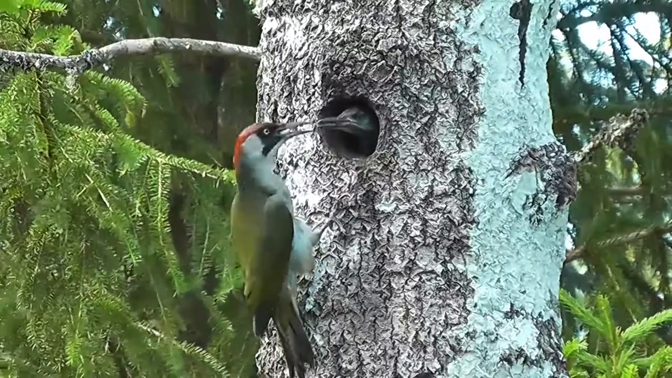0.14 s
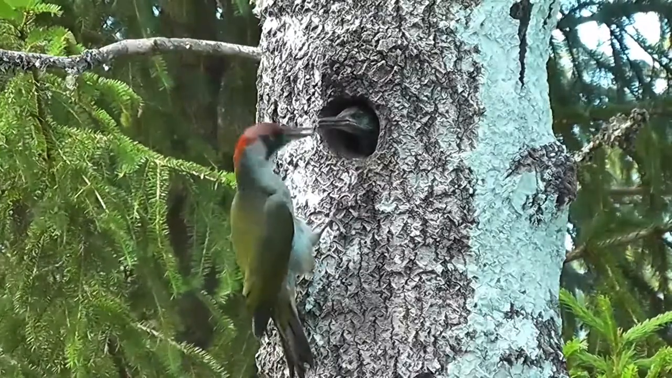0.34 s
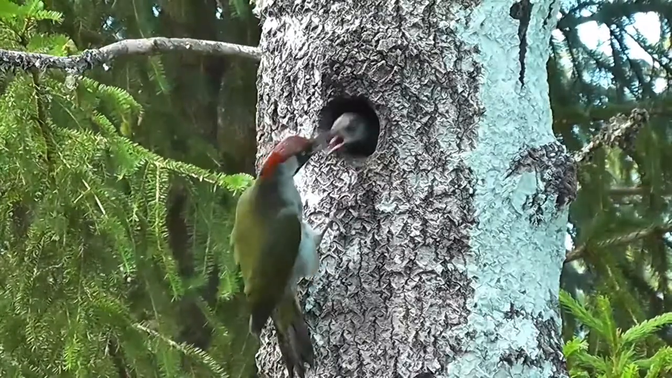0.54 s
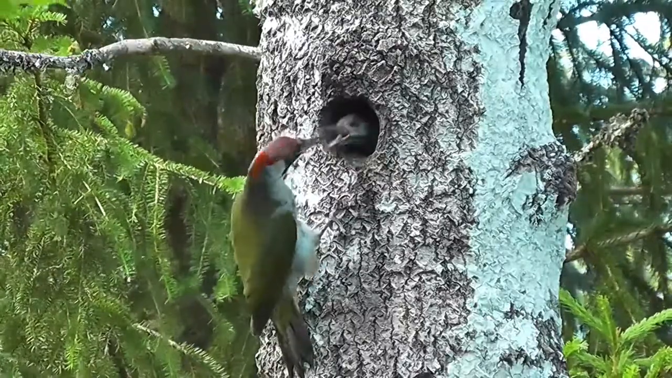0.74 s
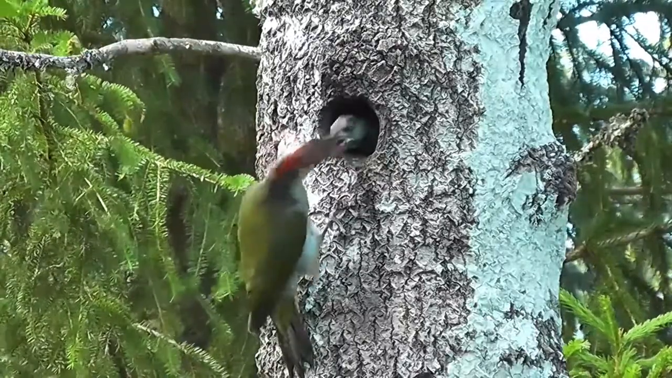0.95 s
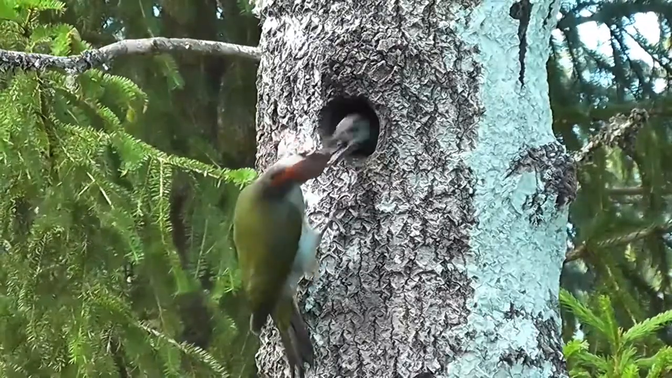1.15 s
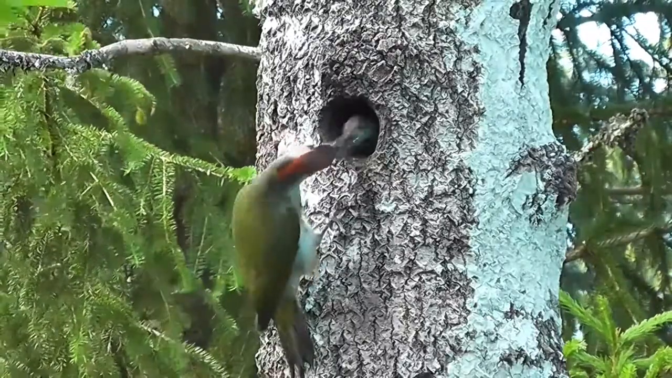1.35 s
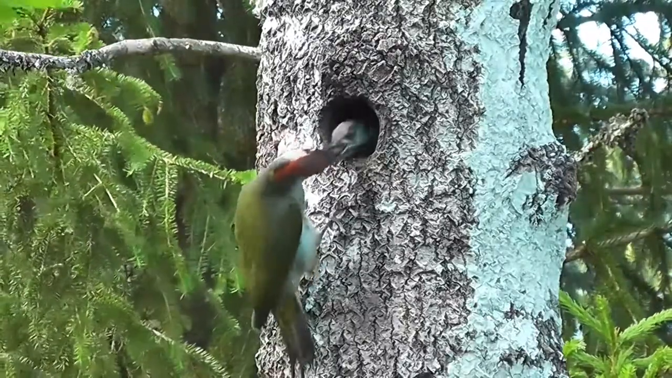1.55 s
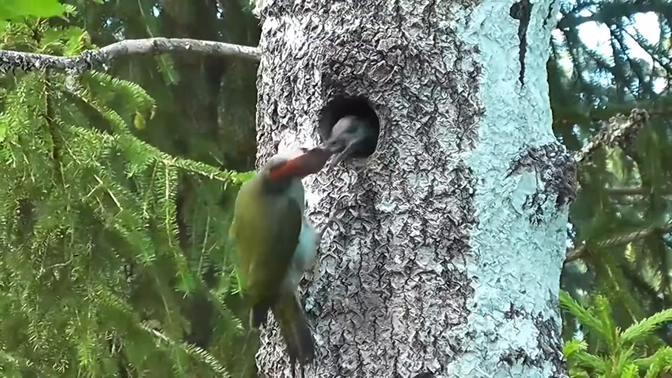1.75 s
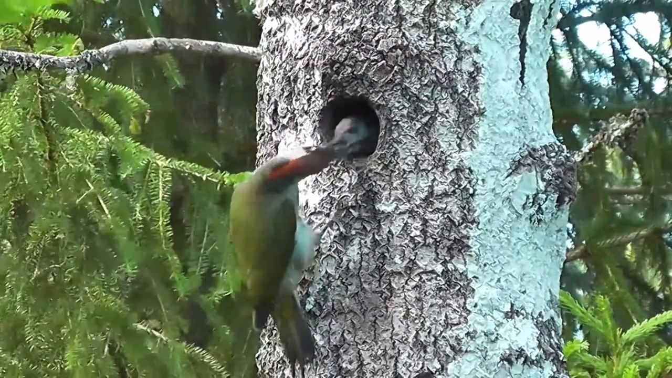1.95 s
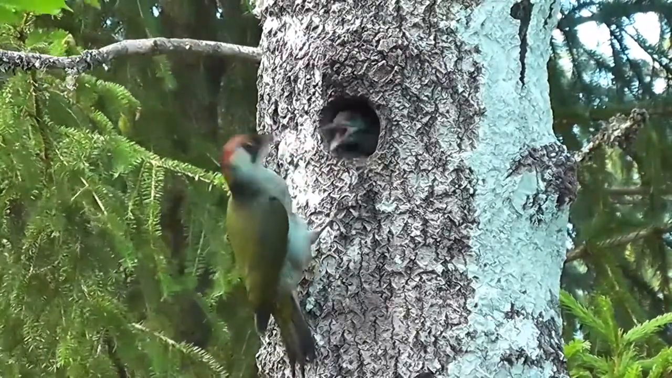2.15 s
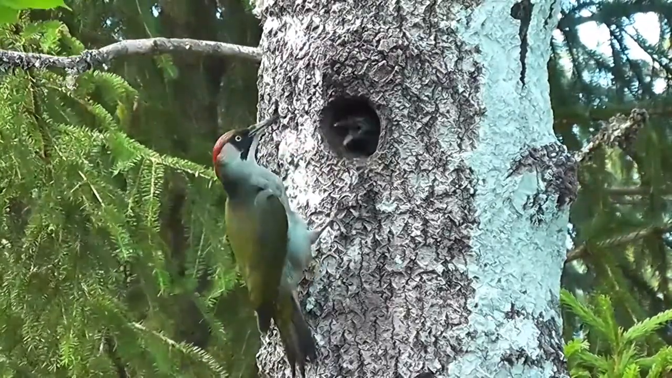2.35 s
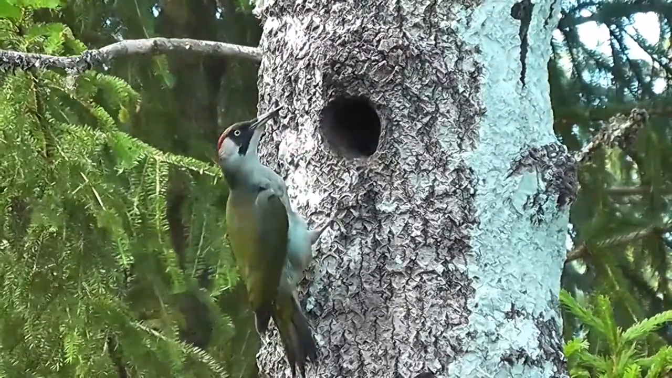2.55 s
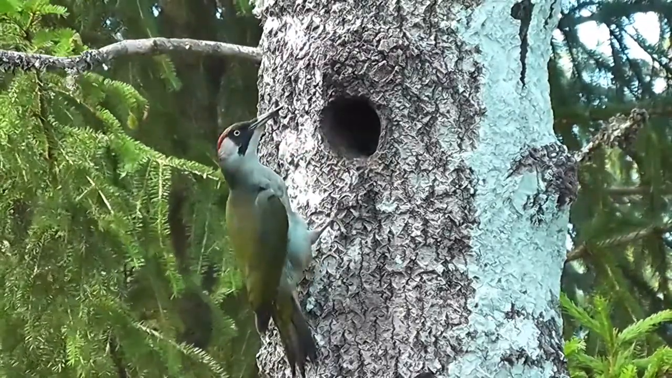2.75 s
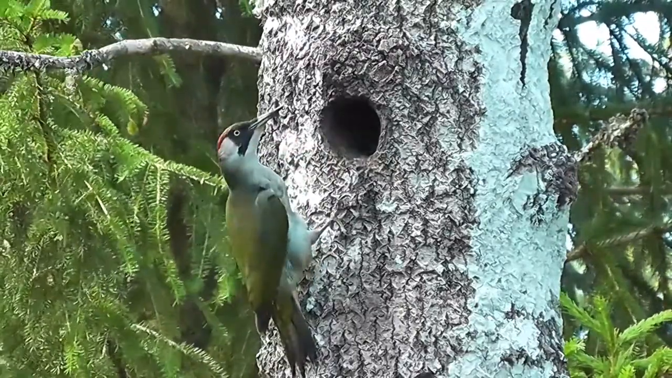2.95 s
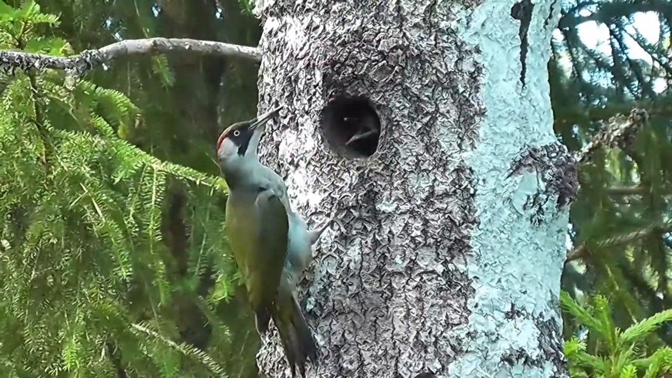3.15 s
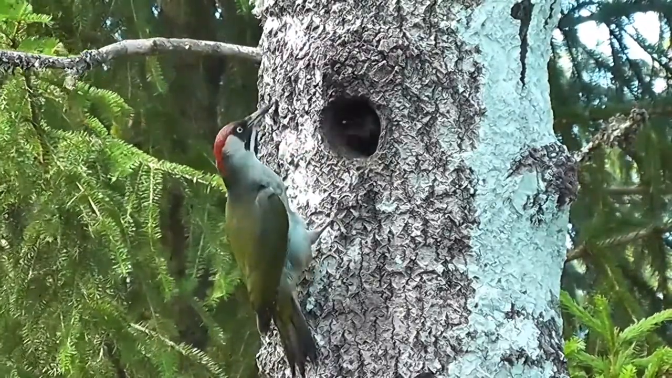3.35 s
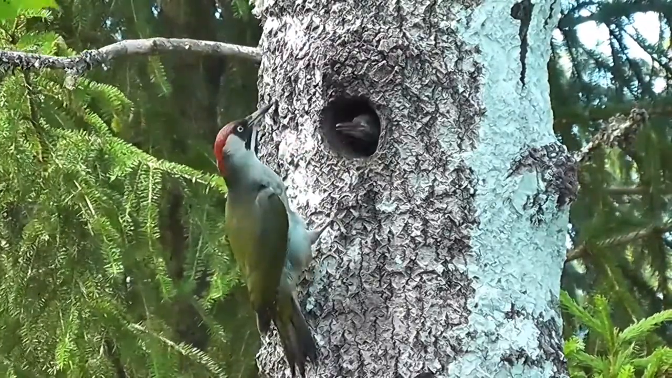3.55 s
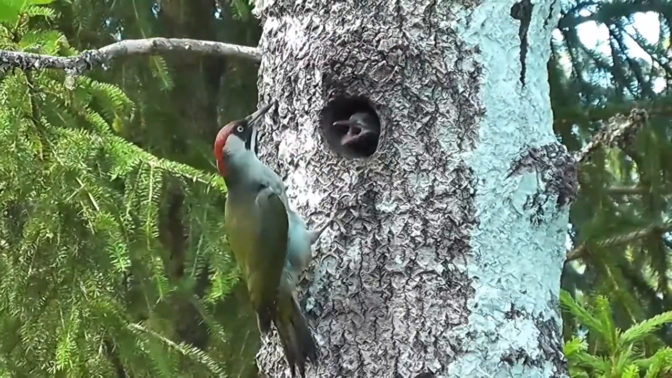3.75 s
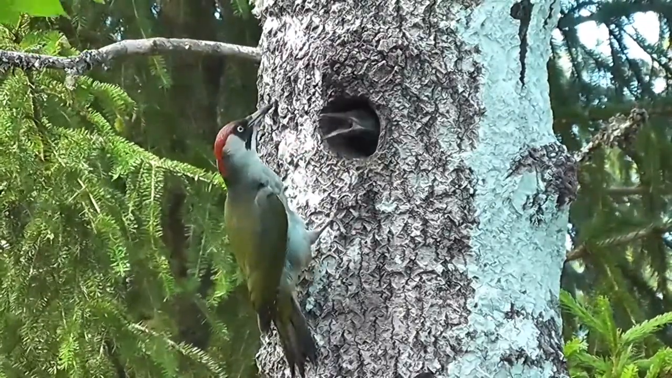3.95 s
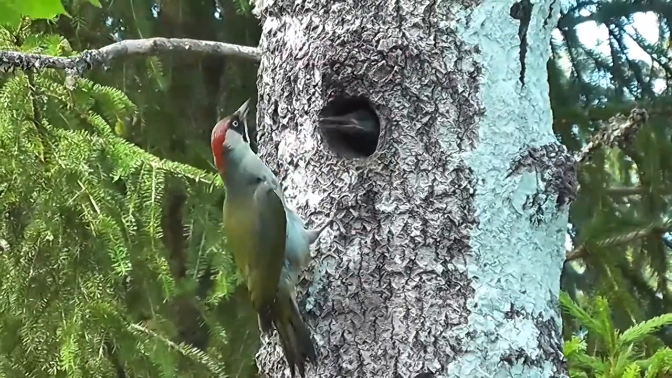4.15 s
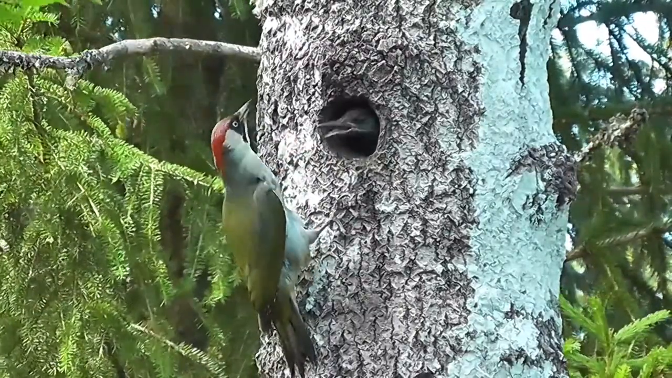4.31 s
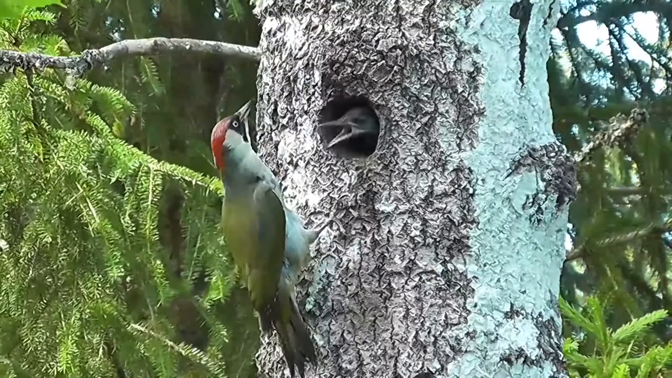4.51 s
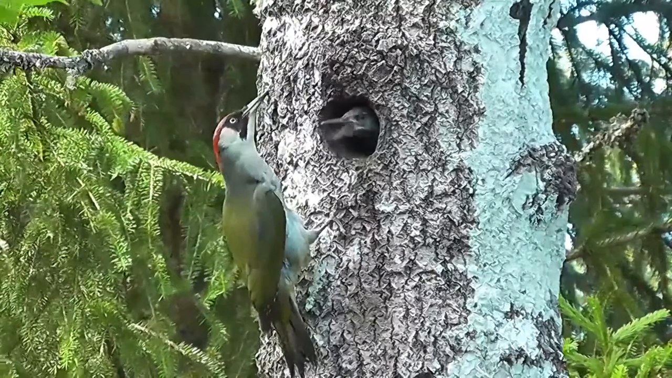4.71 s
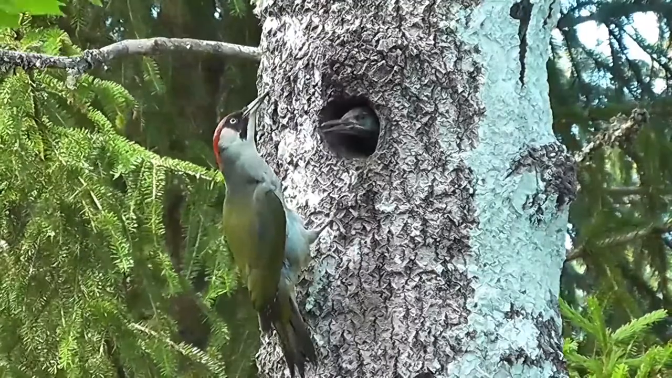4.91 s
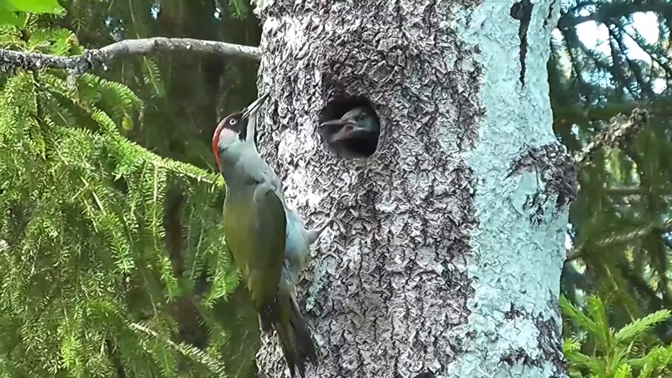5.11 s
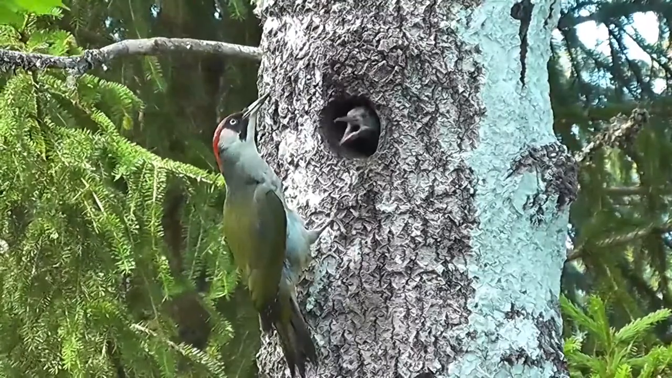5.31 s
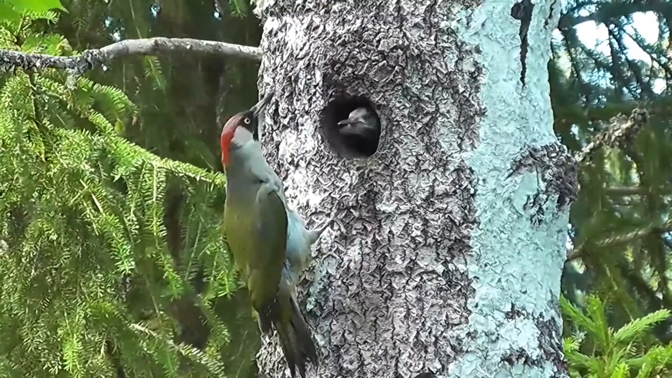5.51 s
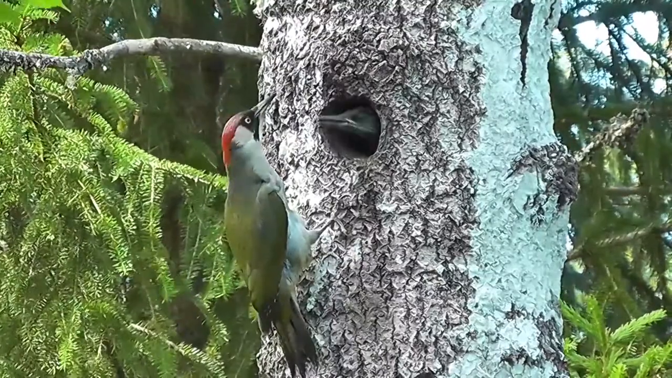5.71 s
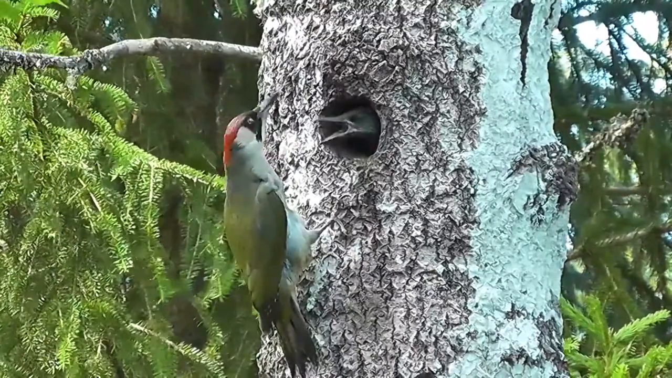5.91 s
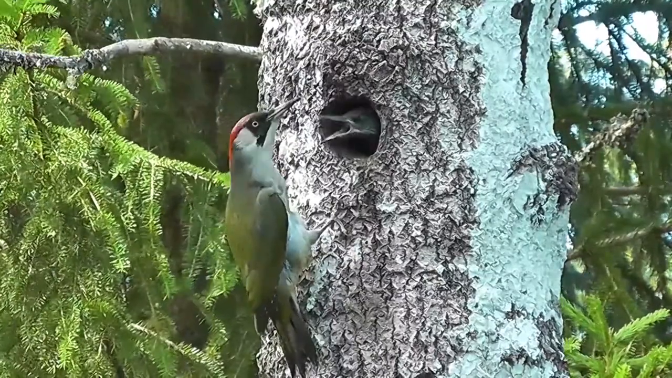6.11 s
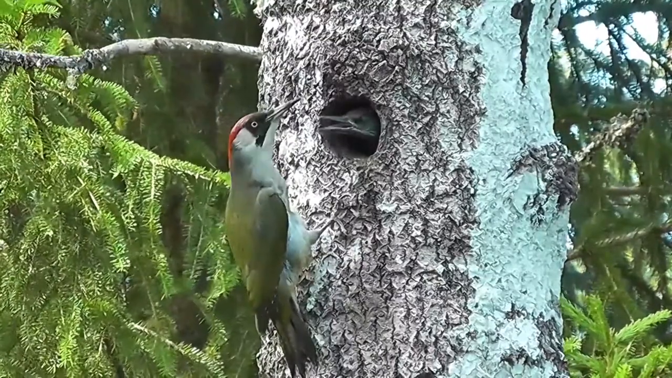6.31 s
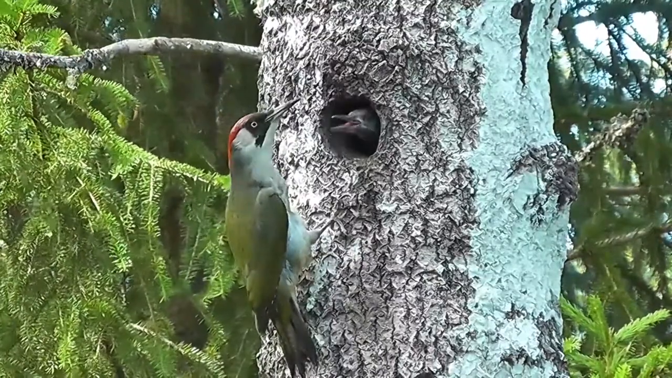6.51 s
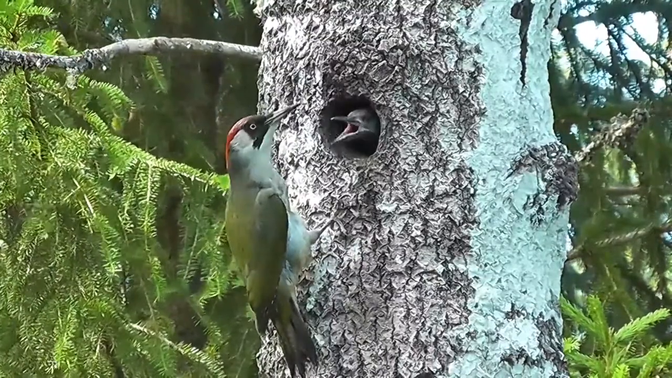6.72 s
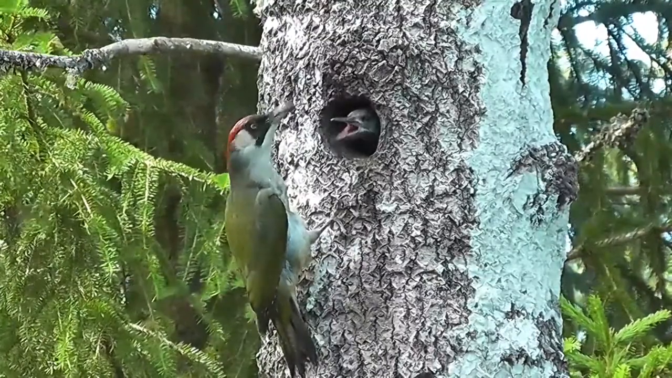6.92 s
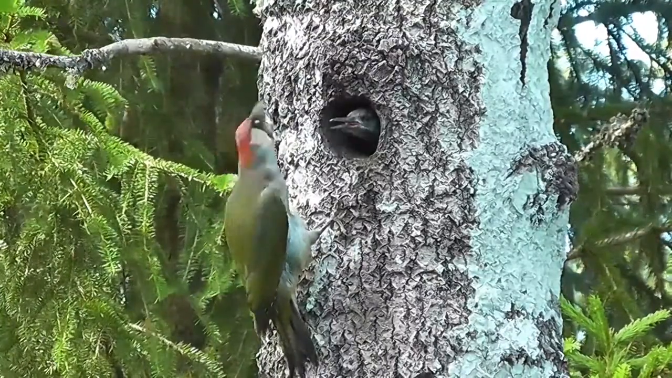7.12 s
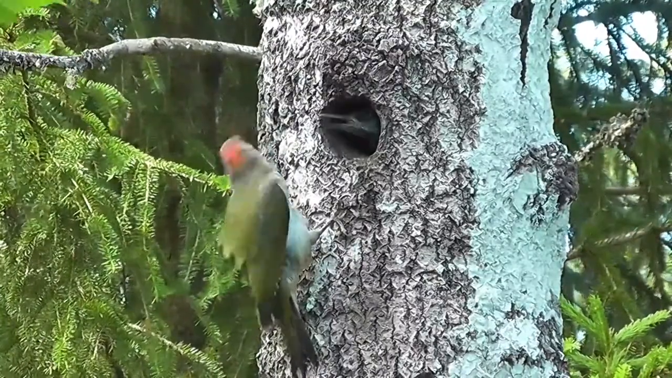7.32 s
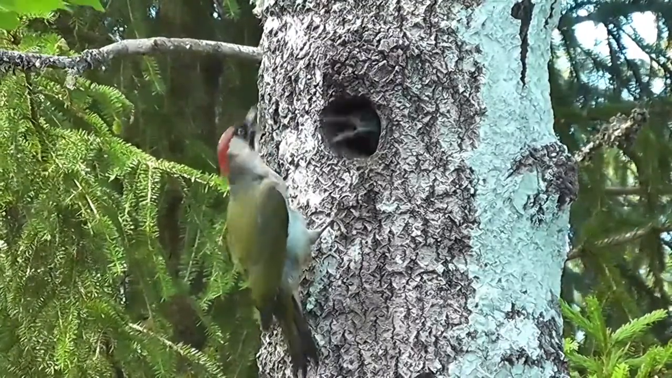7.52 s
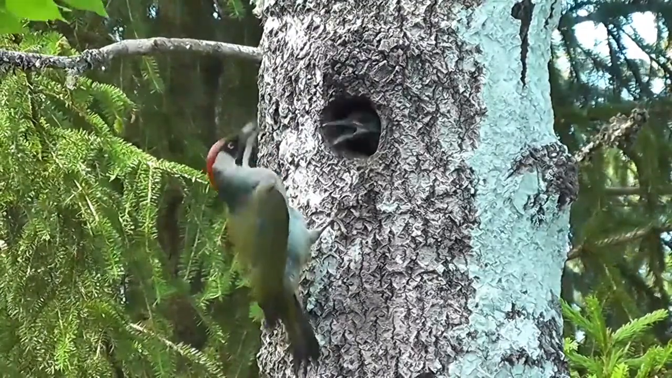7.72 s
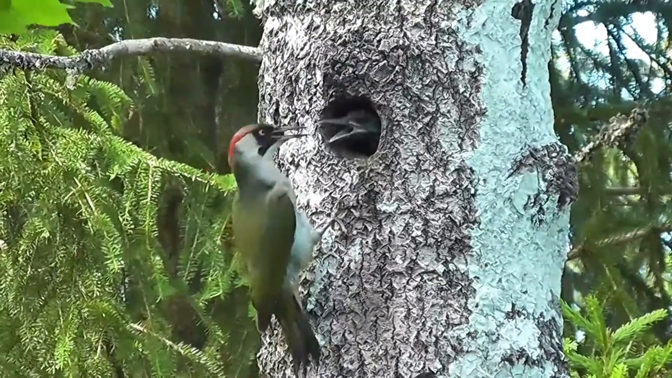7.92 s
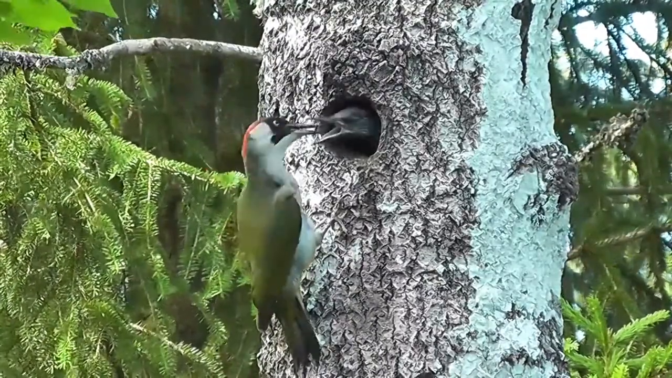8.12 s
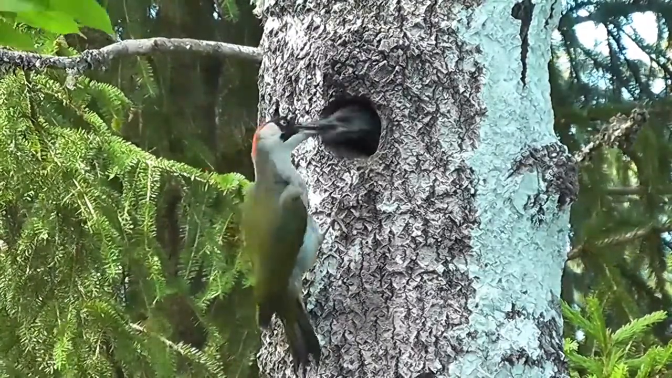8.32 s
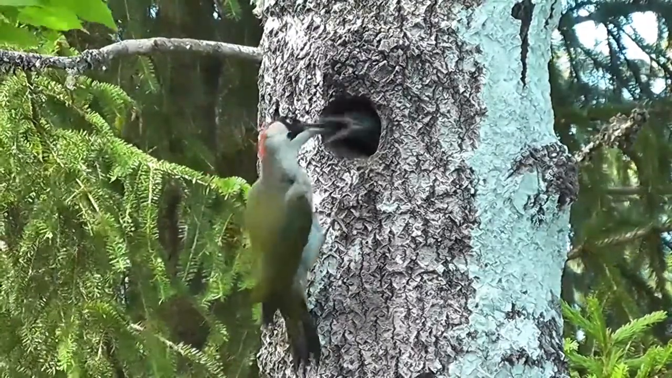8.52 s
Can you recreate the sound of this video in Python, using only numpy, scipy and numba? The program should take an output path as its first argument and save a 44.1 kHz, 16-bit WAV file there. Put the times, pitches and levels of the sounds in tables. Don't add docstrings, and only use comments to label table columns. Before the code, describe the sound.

A young woodpecker in a nest hole repeats harsh, scratchy notes, each a rasp snapping into a short falling yelp, three to four a second. A far songbird whistles thinly at first. The chick turns weak and peepy while fed, then begs loudly and steadily, ending a little rougher. Outdoor woodland, light echo from trees, soft hiss, low rumble and small wind puffs at the microphone.

```python
import sys
import numpy as np
from scipy import signal
from scipy.fft import rfft, irfft, next_fast_len
from scipy.io import wavfile
from scipy.ndimage import uniform_filter1d
from numba import njit

SR = 44100
rng = np.random.default_rng(int(sys.argv[2]) if len(sys.argv) > 2 else 0)


def attenuation_scalar(level_db):
    decades = np.asarray(level_db, float) / 20
    return 10 ** decades


def digitize_waveform(pressure):
    field = np.atleast_2d(pressure).T
    bounded = np.clip(field, -1, 1)
    quanta = np.round(bounded * 32767).astype(np.int16)
    wavfile.write(sys.argv[1], SR, quanta)


N = 381906


def level(x, db):
    return x * attenuation_scalar(db) / np.sqrt(np.mean(x ** 2))


def curve(times, values):
    return np.interp(np.arange(N) / SR, np.ravel(times), np.ravel(values))


def walk(rate):
    hold = int(SR / rate)
    steps = np.repeat(rng.standard_normal(N // hold + 1), hold)
    return 0.65 * uniform_filter1d(uniform_filter1d(steps, hold), hold)[:N]


@njit
def svf(x, hz, width):
    y, band, low = np.empty(len(x)), 0., 0.
    for i in range(len(x)):
        g, k = np.tan(np.pi * hz[i] / SR), width[i] / hz[i]
        v = (band + g * (x[i] - low)) / (1 + g * (g + k))
        band, low, y[i] = 2 * v - band, low + 2 * g * v, k * v
    return y


def steep(x, hz, width):
    hz, width = hz + np.zeros(N), 1.69 * width + np.zeros(N)
    return svf(svf(x, hz, width), hz, width)


def ring(x, modes):
    total = np.zeros(N)
    for k, (hz, width, db) in enumerate(modes):
        total = total + (-1) ** k * attenuation_scalar(db) * steep(x, hz, width)
    return level(total, 0)


def wood():
    # frequency in Hz, level in dB per Hz.
    spectrum = [(20, -17), (60, -4.5), (120, -5), (200, -3), (550, -4), (900, -9), (1400, -13.5),
                (2000, -18.5), (3000, -17), (6000, -16), (9000, -25.5), (15500, -41.5)]
    # frequency in Hz, likeness 0-1, left lead in rad, left minus right in dB.
    ports = [(40, .8, 2.5, -2.4), (130, .5, 2.3, -2), (300, .55, 1.7, -1.5), (700, .7, .8, 0),
             (1600, .72, 0, 0), (4000, .94, 0, 0), (9000, .99, 0, 0), (15000, .85, 0, 0)]
    log_hz = np.log(np.arange(1, N // 2 + 2) * SR / N)
    hz, like, lead, tilt_db = np.transpose(ports)
    like = np.interp(log_hz, np.log(hz), np.clip(like, 0, 1))
    lead = np.interp(log_hz, np.log(hz), lead)
    tilt_db = np.interp(log_hz, np.log(hz), tilt_db)
    colour_hz, colour_db = np.transpose(spectrum)
    colour = attenuation_scalar(np.interp(log_hz, np.log(colour_hz), colour_db))
    one, other = rfft(rng.standard_normal((2, N)) * attenuation_scalar(1.1 * walk(1.77)))
    hiss = level(irfft(colour * one, N), -52)
    hum = level(steep(rng.standard_normal(N), 61.9, 6), -59)
    left = rfft(hiss + hum)
    apart = np.sqrt(1 - like ** 2) * other * np.abs(left) / np.abs(other)
    right = like * np.exp(-1j * lead) * left + apart
    return irfft([left * attenuation_scalar(tilt_db / 2), right * attenuation_scalar(0.5 - tilt_db / 2)], N)


def wind():
    # centre in seconds, level in dB, pitch in Hz.
    gusts = [
        (2.15, -66, 86),
        (3.0, -42, 94.5),
        (3.681, -49, 75.6),
    ]
    t = np.arange(N) / SR
    puffs = np.zeros(N)
    for s, db, hz in gusts:
        puffs += attenuation_scalar(db) * np.exp(-((t - s) / 0.02) ** 2) * np.sin(2 * np.pi * hz * (t - s))
    return np.array([puffs, -puffs])


@njit
def trunks(x, lags, gain, damp):
    line, soft, out = np.zeros((8, 4096)), np.zeros(8), np.zeros((2, len(x)))
    for i in range(len(x)):
        total = 0.
        for k in range(8):
            soft[k] += (1 - damp) * (gain[k] * line[k, (i - lags[k]) & 4095] - soft[k])
            total += soft[k]
            out[k % 2, i] += soft[k]
        for k in range(8):
            line[k, i & 4095] = x[i] + soft[k] - total / 4
    return out


def trees(bird, far):
    trunk_t60_s, near_t60_s = 0.33, 0.2
    echo_db, near_db, wide = -22, -7.5, 0.16
    lags = rng.integers(300, 2400, 8)
    thrown = ring(bird, [(5000, 13500, -7.0), (1200, 2700, -9.5)]) * np.std(bird)
    long = trunks(thrown + 0.5 * far, lags, attenuation_scalar(-60 * lags / SR / trunk_t60_s), 0.063)
    wash = rng.standard_normal((2, 8000)) * attenuation_scalar(-60 * np.arange(8000) / SR / near_t60_s)
    wash *= attenuation_scalar(near_db - echo_db) / np.sqrt(np.sum(wash ** 2))
    one, other = long + signal.fftconvolve([thrown + 2.8 * far], wash, axes=1)[:, :N]
    side = wide * (one - other)
    return attenuation_scalar(echo_db) * np.array([one + other + side, one + other - side])


def arch(start, crest, hz, db):
    end = crest + 0.062
    s = np.arange(start, end, 0.005)
    climb = (np.maximum(crest - s, 0) / 0.33) ** 1.9
    drop = (np.maximum(s - crest, 0) / 0.14) ** 2.8
    swell_db = np.interp(s, [start, start + 0.035, crest, end], [-11, 0, 0, -3])
    return list(zip(s, hz * (1 - climb - drop), db + swell_db))


def songbird():
    # time in seconds, pitch in Hz, level in dB.
    opening = [
        (0.2, 7600, -58),
        (0.21, 7750, -51),
        (0.235, 7840, -51),
        (0.28, 8700, -47.5),
        (0.3, 8380, -50),
        (0.335, 8450, -50),
    ]
    # start in seconds, crest in seconds, crest pitch in Hz, level in dB.
    arches = [
        (.513, .622, 8200, -48),
        (.89, .995, 8150, -51),
        (1.305, 1.447, 8250, -49),
        (1.75, 1.855, 7950, -56.5),
    ]
    # time in seconds, pitch in Hz, level in dB.
    slurs = [
        [(5.365, 2336, -64), (5.39, 2494, -72), (5.405, 3080, -68)],
        [(6.175, 2365, -67), (6.2, 2400, -60), (6.225, 2950, -56)],
    ]
    calls = [opening] + [arch(*whistle) for whistle in arches] + [list(slur) for slur in slurs]
    s, hz, db = np.transpose(sorted(sum(calls, [])))
    sounding = np.zeros(N)
    for call in calls:
        first, last = call[0][0], call[-1][0]
        sounding += curve([first - 0.004, first, last, last + 0.002], [0, 1, 1, 0])
    pitch = uniform_filter1d(curve(s, hz), size=600) * (1 + 0.0034 * walk(150))
    loudness = attenuation_scalar(curve(s, db) + 2.5 * walk(140))
    return np.sqrt(2) * sounding * loudness * np.sin(2 * np.pi * np.cumsum(pitch) / SR)


def wheeze():
    # time in seconds, pitch of the absent fundamental in Hz, level in dB.
    breath = [
        (3.69, 340.7, -78),
        (3.704, 347, -60),
        (3.72, 378, -62),
        (3.76, 383, -59),
        (3.775, 362, -46),
    ]
    s, hz, db = np.transpose(breath)
    turn = 2 * np.pi * np.cumsum(curve(s, hz)) / SR
    inside = curve(s[[0, -1]], [1, -1]) ** 2 < 1
    return attenuation_scalar(curve(s, db)) * inside * (np.sin(3 * turn) + np.sin(4 * turn) + 0.98 * np.sin(5 * turn))


@njit
def snap(hz, jitter, scatter, chance):
    pulses, phase, p, k = np.zeros(len(hz) + 16), np.empty(len(hz)), 0., 0
    for i in range(len(hz)):
        step = hz[i] * np.exp(jitter[i] * chance[k, 0]) / SR
        p += step
        if p >= 1:
            p, k = p - 1, k + 1
            for j in range(16):
                d = j - 8 + p / step
                size = np.exp(scatter[i] * chance[k, 1])
                pulses[i + j] += size * np.sinc(.8 * d) * (1 + np.cos(np.pi * d / 9))
        phase[i] = p
    return pulses[8:-8], phase


def syrinx(pitch, rough):
    clicks, phase = snap(pitch, 0.15 * rough ** 2, 0.3 * rough, rng.standard_normal((N // 20, 2)))
    air = level(np.exp(-phase / 0.5) * rng.standard_normal(N), 0)
    clicks = level(clicks, 0)
    source = clicks + 2.08 * rough ** 1.13 * air
    beat = clicks + 2.04 * rough * air
    return source, beat


def tract(source, beat, start, lock, top, end, jump, pitch, locked):
    # time in seconds, beak open 0-1, neck drawn in 0-1, facing the microphone 0-1,
    # windpipe open 0-1.
    posture = [(0.041, 0.96, 0.86, 1, 0.67), (.62, 0.87, 0.71, 0.63, 0.52), (.89, 0.97, 0.7, 0.72, 0.56),
               (1.3, .65, 0.97, 0.42, 0.71), (2.6, 0.27, 0.93, .4, 0.74), (2.75, 0.76, -.1, .42, 0.51),
               (3.27, 0.68, 0.48, 0.66, 0.45), (3.65, 0.97, .75, 0.89, 0.48), (4.06, 0.54, 0.44, 0.43, .33),
               (4.75, 0.97, 0.56, 0.45, 0.51), (5.68, 0.7, 0.49, 0.37, 0.06), (5.96, 0.48, .42, 0.31, 0.24),
               (6.23, 0.69, 0.55, 0.59, 0.47), (6.5, 0.85, .45, 0.41, 0.4), (7.06, 0.83, 0.54, .42, 0.39),
               (7.31, 0.43, 0.15, 0.46, 0.31), (8.1, 0.58, 0.18, 0.53, 0.39), (8.63, 0.29, 0.48, 0, 0.37)]
    # centre in Hz, width in Hz, level in dB.
    throat = [(3700, 400, 0)]
    windpipe = [(1089, 340, -5), (3070, 1900, -4)]
    gape = [(5785, 206, -4.5), (6285, 540, 0), (7994, 1100, -7)]
    breath_hiss = [(9220, 2120, 16.5), (12660, 4200, -1)]
    broad_band = [(6900, 1200, 0)]
    s, *controls = np.transpose(posture)
    beak, neck, facing, pipe = (np.interp(start, s, c) for c in controls)
    held = np.c_[start - 0.05, np.r_[start[1:] - 0.06, N / SR]]

    def pose(base, change, v):
        return curve(held, base + change * np.c_[v, v])

    gape_db, hiss_db = pose(-24, 28, beak), pose(-12.5, 14, facing)
    pipe_db = pose(-12, 18.5, pipe) + locked * pose(7.5, -0.88, jump)
    chest_db = pose(-30.5, 27.5, neck) + locked * pose(2, -0.25, jump)
    chest_hz = 850 + 0.12 * (pitch - 850)
    linger_db = curve(np.c_[lock - 0.02, lock, top, end, end + 0.03], np.tile([0, 3, 0, 7, 0], len(top)))
    pipe_hz = np.c_[1110 + 694 * beak, np.full((len(top), 2), 1880)]
    pipe_hz = curve(np.c_[start, top, end], pipe_hz)
    throat_hz = 3760 + 1367 * beak
    rest_hz = 4620 + 0.18 * (throat_hz - 4620)
    throat_hz = curve(np.c_[start, top, end], np.c_[rest_hz, throat_hz, throat_hz]) * (1 + 0.03 * walk(25))
    voice = ring(source, [(throat_hz, pose(396, 550, beak), 0)])
    voice -= attenuation_scalar(pose(-3, 12, facing) - 7.0) * ring(source, throat)
    voice += attenuation_scalar(chest_db + linger_db) * ring(beat, [(chest_hz, 190, 0)])
    voice += attenuation_scalar(pipe_db) * ring(beat, [windpipe[0], (pipe_hz, 480, 0), windpipe[1]])
    voice -= attenuation_scalar(gape_db - 0.96 * locked + 4 * walk(30)) * ring(source, gape)
    voice -= attenuation_scalar(hiss_db - 3.9 * locked + 2.5 * walk(33)) * ring(source, breath_hiss)
    voice += attenuation_scalar(-22 + (gape_db + hiss_db) / 2) * ring(source, broad_band)
    return voice


def chick():
    # start in seconds, top of the yelp in seconds, rasp level in dB, yelp level in dB, pitch in Hz.
    hungry = [
        (0.037, 0.136, -44.5, -32, 843.3),
        (0.322, 0.409, -44, -32, 809),
        (.624, 0.732, -44, -40.5, 853.5),
        (0.89, 1.008, -41, -35, 846),
    ]
    fed = [
        (1.164, 1.189, -59.5, -50, 896),
        (1.305, 1.321, -59, -54.5, 1050),
        (1.524, 1.576, -54.5, -46, 892),
        (1.782, 1.83, -57, -51, 781),
        (2.027, 2.043, -58, -54, 950),
        (2.287, 2.347, -60, -51, 843),
        (2.482, 2.536, -54, -41.5, 887),
        (2.595, 2.61, -58, -53, 863),
    ]
    begging = [(2.746, 2.831, -47, -40, 844), (3.01, 3.085, -41, -29.5, 868),
               (3.267, 3.349, -38.5, -24, 976), (3.518, 3.612, -38.5, -28, 930.4),
               (3.788, 3.884, -37, -25, 965), (4.057, 4.143, -36, -22.5, 916.3),
               (4.324, 4.408, -38, -22, 912), (4.593, 4.681, -39.5, -21, 854),
               (4.863, 4.953, -37.5, -24, 884), (5.159, 5.23, -41, -23, 829), (5.43, 5.51, -36.5, -24, 797),
               (5.678, 5.782, -34, -21.5, 810), (5.96, 6.055, -35, -20.5, 864),
               (6.23, 6.327, -39.5, -22.5, 897.6), (6.504, 6.592, -38.5, -24.5, 850.5),
               (6.797, 6.881, -43, -24, 810), (7.061, 7.149, -41, -27, 914),
               (7.31, 7.426, -38.5, -33.5, 899.5), (7.595, 7.689, -39, -33, 933.6),
               (7.85, 7.955, -37.5, -26.5, 973), (8.098, 8.222, -39, -33, 971),
               (8.363, 8.461, -39.5, -39.5, 955), (8.628, 8.648, -45, -33, 902)]
    start, top, early_db, top_db, hz = np.transpose(hungry + fed + begging)
    jump = top_db - early_db
    late_db = early_db + 0.15 * jump
    yelp_rough = np.clip(0.75 - 0.033 * jump + 0.015 * np.maximum(-40 - top_db, 0), 0.27, 1)
    rise = np.clip(0.011 + 0.52 * (0.094 - top + start), 0.011, 0.016)
    fall_s, clear_s = 0.017, 0.021
    lock = np.maximum(top - 0.015, start + 0.016)
    top = np.maximum(top, lock + 0.002)
    end = top + 0.019

    times = np.c_[start - 2.2 * rise, start - rise, start, start + 0.014, lock, top, top + 0.01, end, end + 0.016]
    rasp_db = np.c_[early_db - 34, early_db - 19, early_db - 5, early_db, late_db]
    yelp_db = np.c_[top_db, top_db - 4, top_db - 10, top_db - 36]
    db = curve(times, np.c_[rasp_db, yelp_db])

    times = np.c_[start, lock, top + 0.004, top + fall_s, top + 2 * fall_s]
    fallen_hz = 0.85 * hz
    pitch = curve(times, np.c_[hz, 1.06 * hz, hz, fallen_hz, 0.85 * fallen_hz])

    times = np.c_[lock, lock + 0.005, top + clear_s, top + 2 * clear_s]
    locked = curve(times, np.tile([0, 0.95, 0.99, 0.25], len(top)))
    times = np.c_[start - 0.06, start - 0.05, end, end + 0.02]
    locked *= curve(times, np.tile([0, 0, 1, 1], len(top))) > 0.3
    rasp_rough = 0.8
    rough = np.clip(rasp_rough + locked * (curve(top, yelp_rough) - rasp_rough), 0, 1)

    source, beat = syrinx(pitch, rough)
    voice = tract(source, beat, start, lock, top, end, jump, pitch, locked)
    return attenuation_scalar(db + 1.3 * walk(60)) * voice * attenuation_scalar(0.5)


def scene():
    bird, far = chick() + wheeze(), songbird()
    lean = 0.45 * steep(bird, 950, 400) + 0.29 * steep(bird, 2500, 610) + 0.32 * steep(bird, 14100, 6300)
    lean = np.roll(lean, 11)
    return wood() + wind() + trees(bird, far) + far + bird + np.array([lean, -lean])


def low_pass(x):
    return signal.sosfilt(signal.butter(12, 15740, fs=SR, output="sos"), x)


def record(dry):
    # frequency in Hz, gain in dB.
    housing = [(2200, 0), (2800, -2), (3150, -4), (3400, 0)]
    hz, db = np.transpose(housing)
    size = next_fast_len(N)
    gain = attenuation_scalar(np.interp(np.arange(size // 2 + 1) * SR / size, hz, db))
    heard = irfft(rfft(dry, size) * gain, size)[:, :N]
    cut = signal.sosfilt(signal.ellip(8, 0.2, 60, 15600, fs=SR, output="sos"), heard)
    return low_pass(cut)


dry = scene()
out = record(dry)
digitize_waveform(out)
```